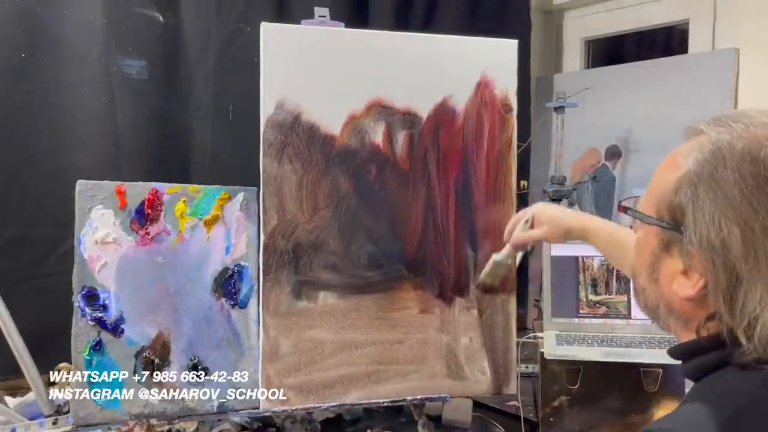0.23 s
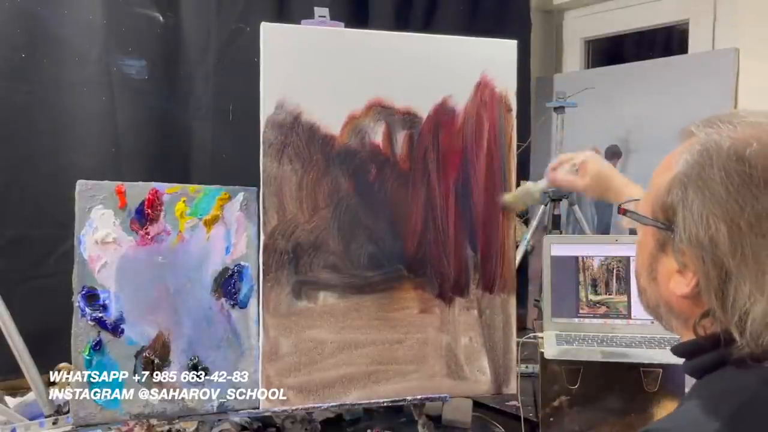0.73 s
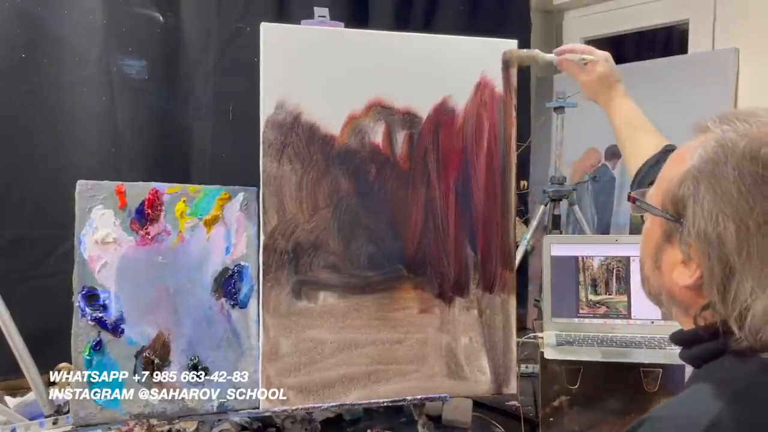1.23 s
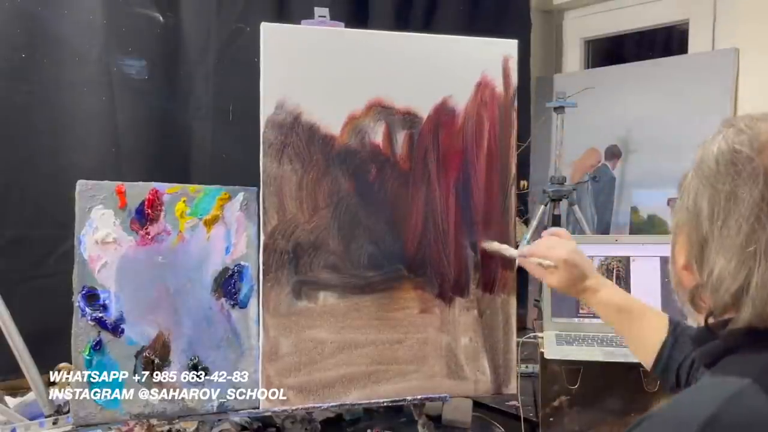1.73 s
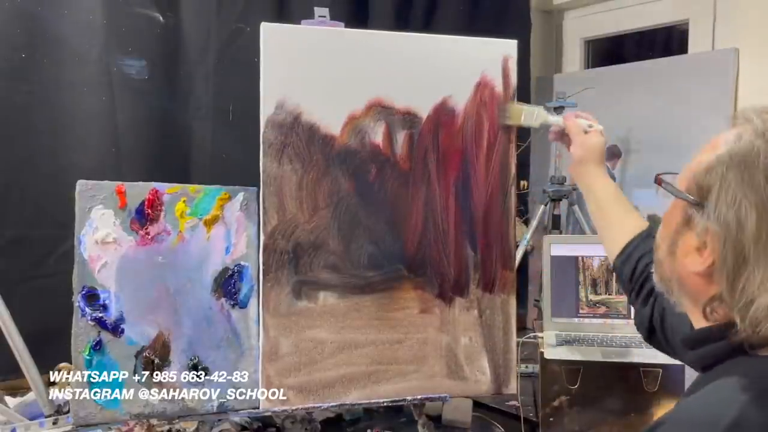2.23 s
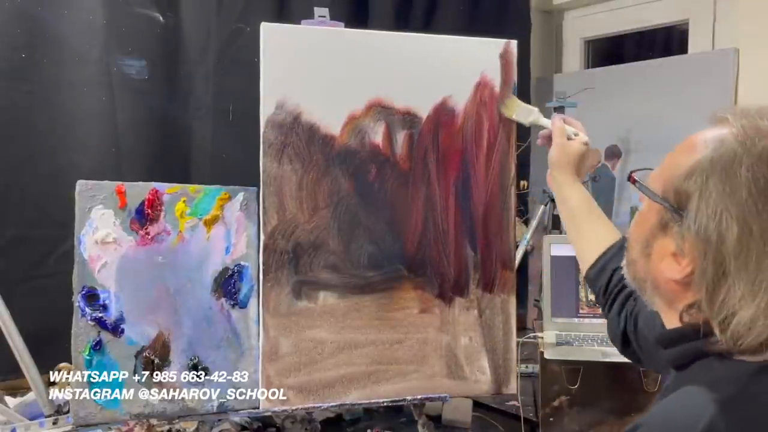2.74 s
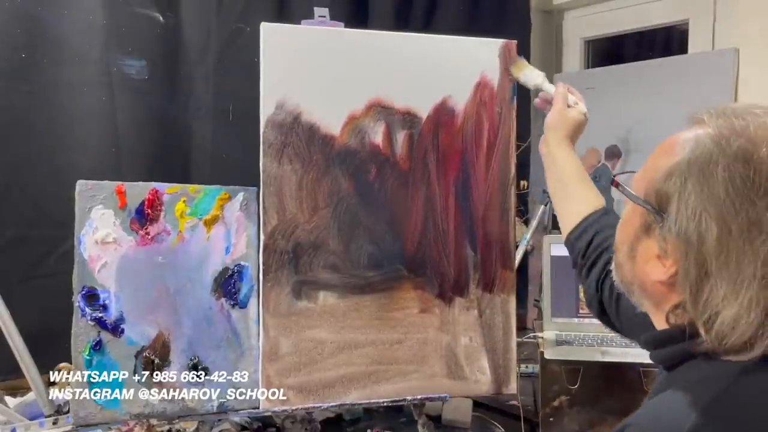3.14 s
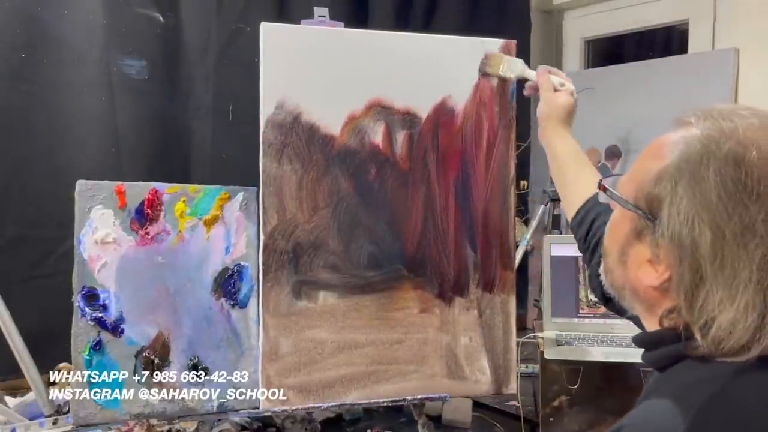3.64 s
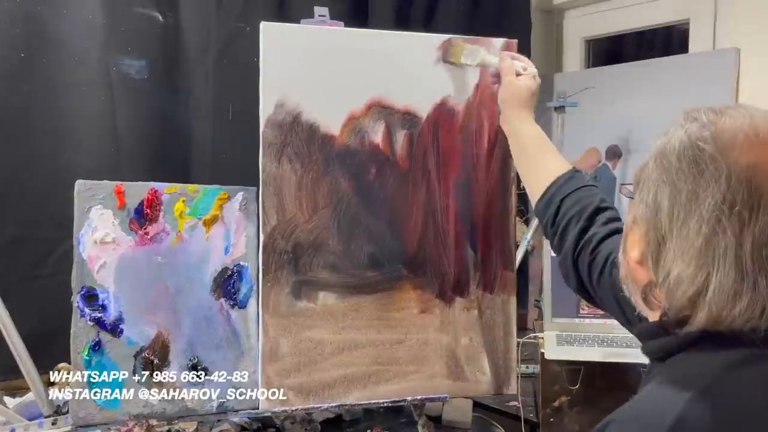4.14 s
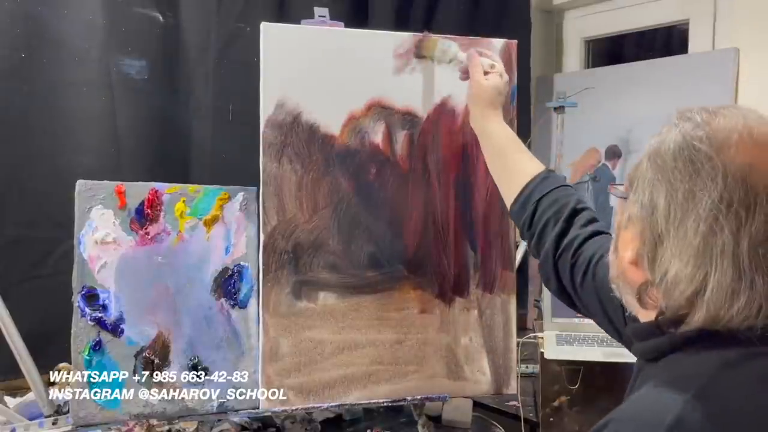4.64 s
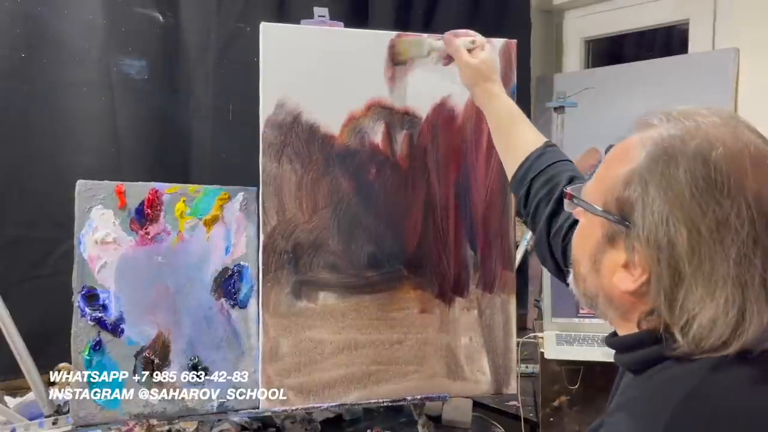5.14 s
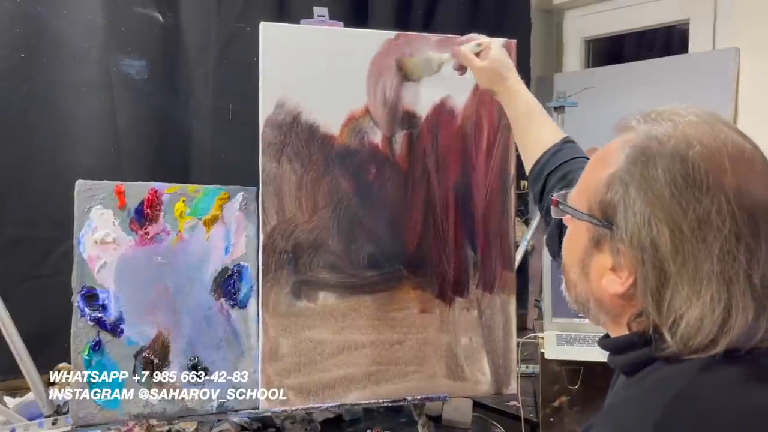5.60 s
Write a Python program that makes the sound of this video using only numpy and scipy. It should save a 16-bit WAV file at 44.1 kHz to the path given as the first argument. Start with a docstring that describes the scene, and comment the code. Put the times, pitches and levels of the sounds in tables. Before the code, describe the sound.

A wide flat bristle brush works paint into a stretched canvas in a quiet indoor room. Separate airy swishes of uneven length come first, with brief near-silent gaps and a soft rasp. Just before four seconds the strokes become fast, louder, joined back-and-forth scrubbing, with cloth rustle, low slack booms and a few dull taps. A close stereo microphone catches bright hiss and a very short room tail.

```python
"""In a quiet studio a wide bristle brush works paint into a stretched canvas: long sweeps, then quick scrubbing.
Bristle tips hiss and the tuft rasps, as flicks and smooth noise shaped by spectra and a gliding resonance.
The cloth rustles through its canvas modes and booms like a slack drum; stiff bristles scuff and the brush bumps it.
Soft echoes, a short tail and still air surround it; a small stereo microphone with resonant ports stands close by."""
import sys
import numpy as np
from scipy import signal
from scipy.fft import rfft, irfft
from scipy.io import wavfile
from scipy.ndimage import uniform_filter1d, map_coordinates

SR = 44100
rng = np.random.default_rng(int(sys.argv[2]) if len(sys.argv) > 2 else 0)


def put_to_file(sound):
    """Save the sound as 16-bit audio at rate SR, in the file named by the first command-line argument."""
    columns = np.atleast_2d(sound).T  # one column per channel
    safe = np.clip(columns, -1, 1)
    whole_steps = np.round(safe * 32767)
    wavfile.write(sys.argv[1], SR, whole_steps.astype(np.int16))


N = 258867
TIME = np.arange(N) / SR

# long sweeps and the light touches between them; full speed lasts from start to stop:
# (start_s, stop_s, attack_s, release_s, hiss_db, rasp_db, rustle_db, tuft_pitch_hz)
SWEEP_STROKES = [(0.107, 0.143, 0.15, .075, -46.5, -54, -55.5, 2118),
                 (0.206, 0.239, 0.049, 0.059, -63, -62, -58, 2200),
                 (0.346, .47, 0.096, 0.093, -48, -55, -63, 2500),
                 (.56, 0.623, 0.029, 0.097, -60.5, -63.5, -61, 2334),
                 (.705, .82, 0.14, 0.11, -47.5, -52, -62.5, 2606),
                 (1.015, 1.205, 0.14, 0.1, -49, -54.5, -66, 2664),
                 (1.31, 1.345, 0.064, .10, -69.5, -69.5, -86, 2293),
                 (1.554, 1.59, .035, .05, -60.5, -61.5, -76, 2650),
                 (1.625, 1.687, 0.096, 0.13, -52, -58.5, -62, 2570),
                 (1.828, 1.95, 0.11, .25, -78.5, -80, -74.5, 2106),
                 (2.074, 2.118, 0.065, 0.078, -68, -71.5, -70.5, 2000),
                 (2.193, 2.467, 0.087, 0.14, -52.5, -59.5, -64.5, 2516),
                 (2.629, 2.721, .05, 0.082, -50, -55.5, -64.5, 2200),
                 (2.84, 3.014, 0.062, 0.061, -50.5, -55.5, -63.5, 2165),
                 (3.127, 3.175, 0.074, 0.1, -55.5, -57.5, -73, 2330),
                 (3.225, 3.299, 0.093, 0.099, -51.5, -57, -68.5, 2497),
                 (3.38, 3.41, .05, .075, -71.5, -75, -78, 2650),
                 (3.57, 3.619, 0.019, .10, -59, -55.5, -55.5, 1961),
                 (3.68, 3.845, 0.097, .07, -49, -56, -60, 2302)]
# quick scrubs, each from one turn of the hand to the next:
# (turn_s, fastest_s, hiss_db, rasp_db, rustle_db, dip_at_turn_db, tuft_pitch_hz)
SCRUB_STROKES = [(3.879, 3.932, -50, -56, -67.5, 6, 2380), (3.98, 4.066, -47, -51, -61, 12, 2580),
                 (4.142, 4.186, -49, -55, -61, 11, 2400), (4.231, 4.312, -43.5, -47, -49, 9, 2328),
                 (4.352, 4.421, -50, -55.5, -59, 11, 2251), (4.451, 4.52, -45, -49.5, -48, 9.5, 2170),
                 (4.575, 4.656, -48.5, -60, -60.5, 11.5, 2153), (4.688, 4.764, -46, -51.5, -56, 9, 2220),
                 (4.815, 4.899, -48.5, -60, -59.5, 8, 2304), (4.964, 5.011, -44.5, -48.5, -55.5, 4, 2430),
                 (5.073, 5.151, -47, -58.5, -56, 12, 2200), (5.176, 5.232, -47, -50.5, -48.5, 3.5, 1920),
                 (5.291, 5.34, -45, -56.5, -54.5, 7.5, 2030), (5.39, 5.469, -43, -51.5, -51.5, 7.5, 2217),
                 (5.505, 5.552, -42, -51, -52, 7.5, 2250), (5.621, 5.67, -44, -50, -51.5, 11, 1930),
                 (5.724, 5.767, -42, -54, -57, 6, 2330), (5.827, 5.879, -44, -49, -50.5, 12, 1900)]


def from_db(db):
    """Decibels to gain."""
    return 10 ** (np.asarray(db) / 20)


def rms_one(x):
    """Scale to unit power."""
    return x / np.sqrt(np.mean(x ** 2) + 1e-20)


def drift(rate_hz):
    """Smooth random wandering with an rms of 1: low-passed noise, drawn at every 40th sample."""
    r = np.exp(-80 * np.pi * rate_hz / SR)
    noise = rng.standard_normal(N // 40 + 2002)
    slow = signal.lfilter([1], [1, -2 * r, r * r], noise)[2000:]   # skip the filter's start
    return np.interp(np.arange(N) / 40, np.arange(len(slow)), rms_one(slow))


def coloured(x, spectrum):
    """Give a steady noise its spectrum, drawn over log frequency; rms 1."""
    hz, db = np.transpose(spectrum)
    bins_hz = np.maximum(np.fft.rfftfreq(N, 1 / SR), 1)
    gain = from_db(np.interp(np.log(bins_hz), np.log(hz), db))
    return rms_one(irfft(rfft(x) * gain, N))


def resonate(x, hz, width_hz):
    """One resonance with gain 1 on top."""
    r = np.exp(-np.pi * width_hz / SR)
    feedback = [1, -(1 + r * r) * np.cos(2 * np.pi * hz / SR), r * r]
    return signal.lfilter(np.array([1, 0, -1]) * (1 - r * r) / 2, feedback, x + 1e-18)


def body(x, modes):
    """Resonances side by side."""
    return sum(from_db(db) * resonate(x, hz, width) for hz, width, db in modes)


def friction(flicks_per_s, spread_db, smooth_db):
    """Bristles catch on threads and flick free, in uneven sizes, over a smooth rub."""
    heights = from_db(spread_db * np.minimum(rng.exponential(1, N), 4))
    sizes = heights * rng.choice([-1, 1], N)
    flicks = rms_one(sizes * (rng.random(N) < flicks_per_s / SR))
    return rms_one(flicks + from_db(smooth_db) * rng.standard_normal(N))


def still_air(level_db, side_db):
    """The air of the room is steady noise: a shared part, and a part of its own on each side."""
    # spectrum of the room's air: (frequency_hz, density_db_per_hz)
    air_spectrum = [(20, -7), (55, 4), (120, -2), (300, -8), (1000, -13), (3000, -16), (8000, -23),
                    (16000, -57)]
    shared = coloured(rng.standard_normal(N), air_spectrum)
    sides = coloured(rng.standard_normal((2, N)), air_spectrum)
    return from_db(level_db) * (shared + from_db(side_db) * sides)


def studio(x, t60_s):
    """A short diffuse tail of fading noise, different on each side."""
    age = TIME[:SR // 2]
    tail = rng.standard_normal((2, len(age))) * from_db(-60 * age / t60_s) * (age > .005)
    tail /= np.sqrt(np.sum(tail ** 2, axis=1, keepdims=True))
    return signal.fftconvolve(x[None], tail, axes=1)[:, :N]


def reflections(x, sway_s):
    """Nearby surfaces echo the brush; the paths change as the arm moves."""
    # early echoes, dealt to left and right in turn: (delay_s, level_db)
    echoes = [(.0019, -5), (.0026, -7.5), (.0058, -8.5), (.0047, -8)]
    out = np.zeros((2, N))
    for k, (delay, db) in enumerate(echoes):
        late = (delay + sway_s * drift(0.766)) * SR
        out[k % 2] += from_db(db) * map_coordinates(x, [np.arange(N) - late], order=3)
    return out


def boom(modes):
    """Drum modes swing under the rubbing; the hand holds the swing steady."""
    rumble = coloured(rng.standard_normal(N), [(20, -12), (50, 2.0), (200, -4.5), (500, -7.5)])
    swing = rms_one(body(rumble, modes))
    return swing / np.sqrt(uniform_filter1d(swing ** 2, size=2400) + .05)


def drum(drag_gain, follow_s, drag_low_db, drag_high_db):
    """The whole cloth booms softly: it follows the drag sluggishly and swells at each shove."""
    # resonances of the whole cloth, lowest first: (pitch_hz, width_hz, level_db)
    drum_modes = [(54.3, 4.5, 3.5), (72.8, 18.6, -0.5), (98, 35, -20), (171, 64, -13)]
    # the brush leans into the cloth: (centre_s, half_length_s, lowest_mode_db, higher_modes_db)
    shoves = [(.26, .035, -73, -63), (.6, .04, -70, -77), (2.88, .04, -82, -69), (4.031, .03, -72, -64.5),
              (4.38, 0.047, -69, -56), (4.56, .04, -65, -62), (4.821, .045, -69, -53.5),
              (5.28, 0.051, -54, -64), (5.433, 0.053, -62, -57.5), (5.728, 0.053, -55, -55),
              (5.84, 0.028, -54, -53.5)]
    keep = np.exp(-1 / (follow_s * SR))
    drag = signal.lfilter([1 - keep], [1, -keep], drag_gain)
    low, high = from_db(drag_low_db) * drag, from_db(drag_high_db) * drag
    for s, half, low_db, high_db in shoves:
        swell = np.exp(-.5 * ((TIME - s) / half) ** 2)
        low = np.hypot(low, from_db(low_db) * swell)
        high = np.hypot(high, from_db(high_db) * swell)
    return low * boom(drum_modes[:1]) + high * boom(drum_modes[1:])


def bumps(width_hz):
    """The heel of the tuft lands: a dull, quickly damped tap."""
    # the brush bumps the cloth: (start_s, peak_db, pitch_hz)
    taps = [(.205, -54, 780), (.238, -50.5, 643), (.605, -60, 596.5), (5.145, -44.5, 533),
            (5.417, -41, 527), (5.757, -45.5, 950)]
    out = np.zeros(N)
    for s, db, hz in taps:
        age = np.maximum(TIME - s, 0)
        swell = np.minimum(np.pi * width_hz * age, 60)
        out += from_db(db) * swell * np.exp(1 - swell) * np.sin(2 * np.pi * hz * age)
    return out


def cloth(ring_db, wander_db, patchy_db):
    """Dragged weave rustles and rings; which mode speaks depends on where the brush is, drawn as drift."""
    # spectrum of the dragged weave: (frequency_hz, density_db_per_hz)
    rustle_spectrum = [(60, -38), (150, -0.5), (300, -1), (500, 1), (1100, 4), (1600, -2), (2700, -23.5),
                       (5000, -48)]
    # resonances of canvas and frame: (pitch_hz, width_hz, level_db)
    canvas_modes = [(365, 28, 1.5), (487, 73, -7.5), (575, 39, -3), (650, 125, -7), (755, 53, 2),
                    (932, 12, -2), (1179, 43, 0.5), (1405, 26, 3.5), (1645, 187, 8), (2080, 34, -2),
                    (2460, 30, 2), (2685, 11, 26)]
    drag = coloured(friction(flicks_per_s=1200, spread_db=2.5, smooth_db=-4.0), rustle_spectrum)
    rings = sum(body(drag * from_db(wander_db * drift(20.0)), [mode]) for mode in canvas_modes)
    return rms_one(drag + from_db(ring_db) * rings) * from_db(patchy_db * drift(26))


def scuffs(relative_width):
    """Stiff bristles near the ferrule scrape briefly, in a narrower band than the tips."""
    # the heel of the tuft drags for a moment: (centre_s, level_db, pitch_hz, half_length_s)
    heel_drags = [(0.364, -59, 1360, 0.046), (0.791, -50, 2960, 0.035), (1.308, -65, 2150, 0.032),
                  (1.648, -53.5, 2570, 0.036), (1.744, -65, 1500, 0.019), (1.844, -72, 1000, 0.057),
                  (2.182, -61.5, 1340, 0.033), (2.44, -53.5, 2330, 0.056), (2.639, -53.5, 1913, 0.028),
                  (2.977, -55, 1932, 0.054), (3.654, -55.5, 1988, 0.041), (3.828, -52, 2093, .016)]
    out, rub = np.zeros(N), friction(flicks_per_s=1200, spread_db=5.5, smooth_db=2.5)
    for s, db, hz, half in heel_drags:
        width_hz = relative_width * hz
        scrape = resonate(resonate(rub, hz, width_hz), hz, width_hz)
        out += from_db(db) * rms_one(scrape) * np.exp(-.5 * ((TIME - s) / half) ** 2)
    return out


def tuft_pitch(wander_hz):
    """Each stroke bends the tuft to a pitch of its own; it glides from one to the next."""
    sweep_bends = [((start + stop) / 2, hz) for start, stop, *_, hz in SWEEP_STROKES]
    scrub_bends = [(fastest, hz) for _, fastest, *_, hz in SCRUB_STROKES]
    return np.interp(TIME, *np.transpose(sweep_bends + scrub_bends)) + wander_hz * drift(4)


def tuft(width_hz, ring_db, chatter_db):
    """Broad rasp of the bristle bundle, with a resonance that glides as it bends; clumps stick and slip."""
    # spectrum of the rasp: (frequency_hz, density_db_per_hz)
    rasp_spectrum = [(500, -23), (1200, -8.5), (1800, -6), (3000, -1.5), (4000, -6.5), (7000, -19)]
    hz = tuft_pitch(wander_hz=44.93)
    r = np.exp(-np.pi * width_hz / SR)
    noise = rng.standard_normal(N) + 1j * rng.standard_normal(N)
    shiver = signal.lfilter([1], [1, -2 * r, r * r], noise)
    # the slow complex noise is shifted up to the gliding pitch
    ring = rms_one(np.real(shiver * np.exp(2j * np.pi * np.cumsum(hz) / SR)))
    scrape = coloured(friction(flicks_per_s=2500, spread_db=3.0, smooth_db=-0.5), rasp_spectrum)
    return rms_one((scrape + from_db(ring_db) * ring) * from_db(chatter_db * drift(78)))


def bristle_tips():
    """Many fine tips flick over the weave so densely that they hiss."""
    # spectrum of the hiss: (frequency_hz, density_db_per_hz)
    hiss_spectrum = [(300, -34), (1200, -7.5), (2500, 0), (3600, -3.5), (5500, -1), (7500, 2), (9000, 4),
                     (11000, 2), (12300, 1), (13200, -13.5), (15500, -20.5)]
    return coloured(friction(flicks_per_s=9000, spread_db=2.5, smooth_db=0.0), hiss_spectrum)


def sweep_gains():
    """In a long sweep the hand speeds up, holds its pace and slows, while its push on the cloth eases."""
    fade_db, fade_shape = 21.5, 1.3   # drop over one attack or release; it steepens away from full speed
    rustle_sag_db_per_s = 34
    rasp_steepness = 1.03   # the rasp needs more speed than the hiss, and fades sooner
    power = np.zeros((3, N))
    for start, stop, attack, release, hiss_db, rasp_db, rustle_db, _ in SWEEP_STROKES:
        away = np.maximum(start - TIME, 0) / attack + np.maximum(TIME - stop, 0) / release
        pace = from_db(-fade_db * np.minimum(np.abs(away), 10) ** fade_shape)
        push = from_db(-rustle_sag_db_per_s * np.clip(TIME - start, 0, stop - start))
        hiss = from_db(hiss_db) * pace
        rasp = from_db(rasp_db) * pace ** rasp_steepness
        rustle = from_db(rustle_db) * pace * push
        power += np.square([hiss, rasp, rustle])
    return np.sqrt(power)


def stroke_gains():
    """Hiss, rasp and rustle follow the hand; in a scrub its speed swells and falls to nothing at each turn."""
    last_turn_s = 5.92
    turn, fastest, *levels, dip_db, _ = np.transpose(SCRUB_STROKES)
    moments = np.append(np.column_stack([turn, fastest]), last_turn_s)
    speed = np.abs(np.sin(np.pi / 2 * np.interp(TIME, moments, np.arange(len(moments)))))
    # bent bristles keep sliding through the turn
    slack = from_db(-np.interp(TIME, turn, np.abs(dip_db))) ** 2
    peaks = from_db([np.interp(TIME, fastest, db) for db in levels])
    scrubs = peaks * np.sqrt(slack + (1 - slack) * speed ** 2.54)
    return np.where(TIME < turn[0], sweep_gains(), scrubs)


def scene():
    """The brush on the canvas, its echoes and the still air of the room."""
    hiss_gain, rasp_gain, rustle_gain = stroke_gains()
    hiss = hiss_gain * bristle_tips()
    rasp = rasp_gain * tuft(width_hz=1010, ring_db=-2.0, chatter_db=0.83)
    rustle = rustle_gain * cloth(ring_db=1.5, wander_db=5.0, patchy_db=1.45)
    grip = from_db(0.75 * drift(45))   # uneven paint makes the bristles catch
    rubbing = grip * (hiss + rasp + rustle + scuffs(relative_width=0.5))
    brush = rubbing + bumps(width_hz=204)
    # drapes and clothes swallow the top of every echo
    soft = signal.sosfilt(signal.butter(6, 8200, fs=SR, output="sos"), brush)
    near = brush + reflections(soft, sway_s=0.000311) + from_db(-7.0) * studio(soft, t60_s=0.15)
    placed = near * from_db([[.15], [-.15]])   # a touch louder on the left
    # boom from plain dragging is set relative to the rustle
    low_boom = drum(rustle_gain, follow_s=0.065, drag_low_db=-12.5, drag_high_db=-11.5)
    return placed + low_boom + still_air(level_db=-74, side_db=-4.5)


def record(dry):
    """The microphone ports ring in the top treble and turn the phase between the sides; the top is cut."""
    # the left port lags in the treble: (frequency_hz, lag_radians)
    port_lag = [(0, 0), (8800, 0), (10200, 3.1), (11700, 6.2), (12600, 6.4), (13300, 9.2), (14200, 9.6),
                (14800, 12.5)]
    left, right = dry + from_db(9.0) * resonate(dry, hz=10600, width_hz=850)
    lag = np.interp(np.fft.rfftfreq(N, 1 / SR), *np.transpose(port_lag))
    left = irfft(rfft(left) * np.exp(-1j * lag), N)
    top_cut = signal.ellip(10, .1, 70, 15800, fs=SR, output="sos")   # steep low-pass at 15800 Hz
    return signal.sosfilt(top_cut, [left, right])


dry = scene()
out = record(dry)
put_to_file(out)
```